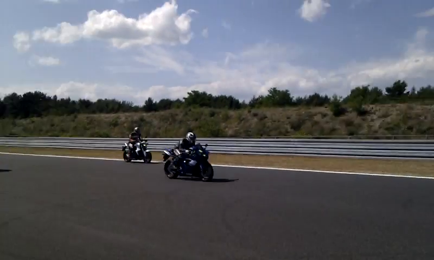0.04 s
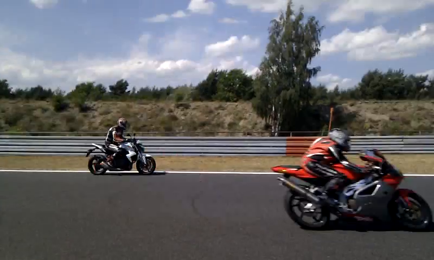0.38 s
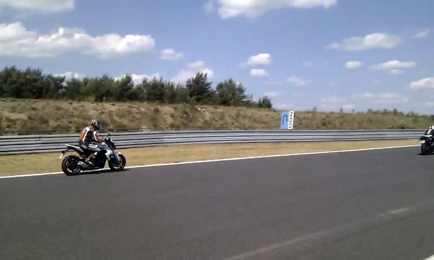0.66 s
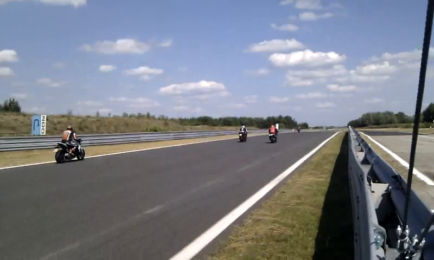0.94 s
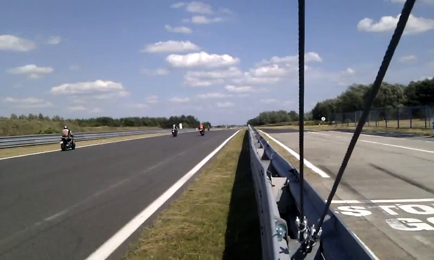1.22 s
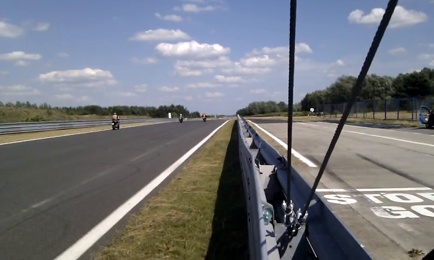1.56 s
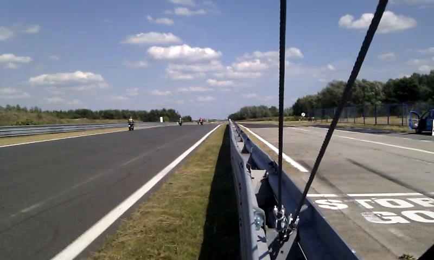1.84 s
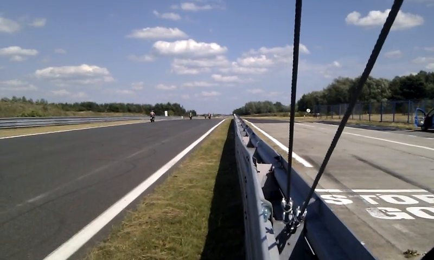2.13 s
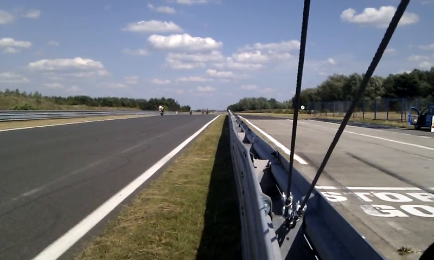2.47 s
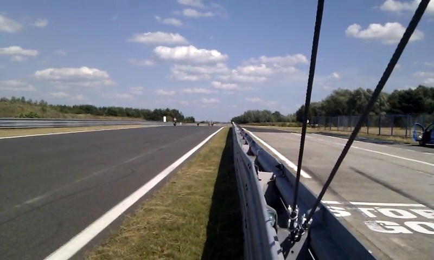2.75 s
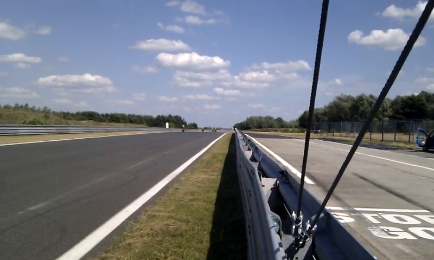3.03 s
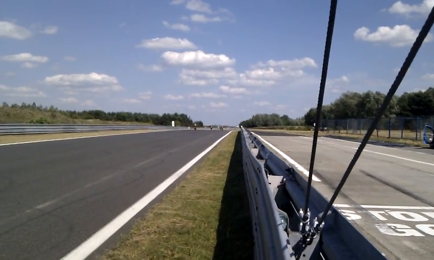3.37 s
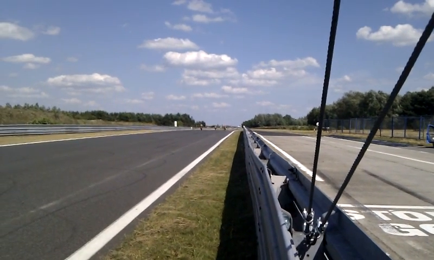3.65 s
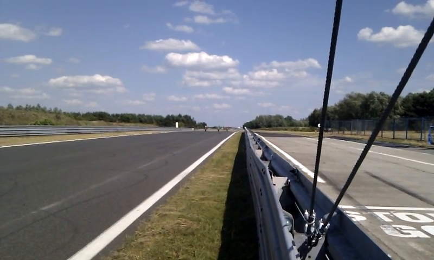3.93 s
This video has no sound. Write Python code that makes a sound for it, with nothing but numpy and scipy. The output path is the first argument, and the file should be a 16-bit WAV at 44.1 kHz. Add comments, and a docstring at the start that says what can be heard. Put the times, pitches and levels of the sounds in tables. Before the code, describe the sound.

Racing motorcycles roar by in quick succession outdoors, slightly overloading the trackside microphone. Their notes fall and recede, then a far bike faintly blips its throttle and others drone under soft wind rumble.

```python
"""Racing motorcycles passing

Three bikes pass close by, drop in pitch by the Doppler effect and fade down the straight. Each is a
sum of engine orders, intake ahead and exhaust behind, in a rush of tyres, chain and air. Later a far
bike blips its throttle and others drone. Wind bumps the small microphone, which overloads at the pass."""
import sys
import numpy as np
from scipy import signal
from scipy.fft import rfft, irfft, next_fast_len
from scipy.io import wavfile
from scipy.ndimage import uniform_filter1d, map_coordinates

SR = 44100
rng = np.random.default_rng(int(sys.argv[2]) if len(sys.argv) > 2 else 0)


def file_out(sig):
    """Save sig as 16-bit WAV at sys.argv[1]."""
    # one column per channel
    cols = np.atleast_2d(sig).T
    # limit, then scale
    lim = np.clip(cols, -1, 1)
    pcm = np.round(lim * 32767).astype(np.int16)
    wavfile.write(sys.argv[1], SR, pcm)


N = 176400
TIME = np.arange(N) / SR


def amp(db):
    """Decibels to amplitude ratio."""
    return 10 ** (np.asarray(db) / 20)


def unit(x):
    """Normalisation to rms 1."""
    return x / np.sqrt(np.mean(x ** 2) + 1e-20)


def gain_at(spectrum, hz):
    """Amplitude from levels interpolated on a log frequency axis."""
    knots_hz, db = np.transpose(spectrum)
    return amp(np.interp(np.log(hz + 1), np.log(knots_hz + 1), db))


def curves(rows):
    """Linear interpolation of each column over time."""
    times, *columns = np.transpose(rows)
    return [np.interp(TIME, times, column) for column in columns]


def wobble(rate):
    """Smooth random modulation, rate knots a second."""
    return map_coordinates(rng.standard_normal(8192), [TIME * rate], mode="wrap")


def filtered(x, response):
    """Filtering by multiplication of the spectrum."""
    size = next_fast_len(N + SR // 2)
    return irfft(rfft(x, size) * response(np.fft.rfftfreq(size, 1 / SR)), size)[:N]


def noise(spectrum, patchy_db=1.5):
    """Coloured noise of rms 1, its gain uneven over time and frequency."""
    frames = signal.stft(rng.standard_normal(N), nperseg=1024)[2]
    patches = uniform_filter1d(rng.standard_normal(frames.shape), size=7, axis=0)
    patches = uniform_filter1d(patches, size=12, axis=1)
    white = signal.istft(frames * amp(patchy_db * unit(patches)), nperseg=1024)[1][:N]
    return unit(filtered(white, lambda hz: gain_at(spectrum, hz)))


# Envelope of the weak engine orders. Each row: frequency in Hz, relative level in dB.
RASP_SPECTRUM = [(60, -25), (200, 1.5), (450, -5), (800, -11), (1500, 8), (2600, -2), (3600, 6),
                 (4300, 1.5), (5000, -4), (6000, -10.5), (8000, -40)]

def rasp(cycles, cycle_hz, count=169, size=8192):
    """Periodicity: one ragged engine cycle, repeated, gives a dense harmonic series."""
    phasors = rng.standard_normal(count) + 1j * rng.standard_normal(count)
    harmonics = gain_at(RASP_SPECTRUM, np.arange(1, count + 1) * cycle_hz) * phasors
    one_cycle = unit(irfft(np.append(0, harmonics), size))
    return np.interp(cycles % 1, np.arange(size) / size, one_cycle, period=1)


def ground_reflection(direct, pass_s, reflection=.75, lowest_notch_hz=470, abeam_s=.095):
    """Interference: the bounce off the asphalt lags most abeam, so a notch sweeps down and up again."""
    lag_s = .5 / lowest_notch_hz / np.hypot(1, (TIME - pass_s) / abeam_s)
    return (direct + reflection * np.interp(TIME - lag_s, TIME, direct)) / (1 + reflection)


def engine(path, orders, pass_s, rasp_coming_db, rasp_going_db, jitter, dulling_db=0, turn_s=.09):
    """Directivity: intake radiates ahead, exhaust behind. Returns the sound and its firing throb."""
    cycle_hz, level_db = curves(path)
    cycles = np.cumsum(cycle_hz * (1 + jitter * wobble(120))) / SR
    going = .5 + .5 * np.tanh((TIME - pass_s) / turn_s)
    tone = np.zeros(N)
    for order, coming_db, going_db in orders:
        order_db = coming_db + (going_db - coming_db) * going + 1.86 * wobble(9)
        # Off the throttle, high orders die first.
        order_db -= dulling_db * order * np.maximum(TIME - pass_s, 0)
        tone += np.sqrt(2) * amp(order_db) * np.sin(2 * np.pi * (order * cycles + rng.random()))
    tone += amp(rasp_coming_db) * np.sqrt(1 - going) * rasp(cycles, cycle_hz[0])
    tone += amp(rasp_going_db) * np.sqrt(going) * rasp(cycles, cycle_hz[SR])
    flutter_db = 1.94 * wobble(27.92)  # the sound trembles in moving air
    throb = np.cos(2 * np.pi * 4 * cycles)  # four firings a cycle
    return amp(level_db + flutter_db) * ground_reflection(tone, pass_s), throb


# Each bike as heard. Each row: time in seconds, Doppler-shifted cycle rate in Hz, level in dB.
LEAD_PATH = [(0, 51.01, -11), (.2, 48.57, 1), (.3, 45.91, 5.5), (.4, 41.95, 3.5), (.52, 38.83, -1),
             (.63, 37.46, 0), (.85, 36.42, -5.5), (1.05, 35.99, -12), (1.4, 35.1, -17.5), (2, 33.96, -22),
             (2.3, 33.35, -23.5), (2.5, 32.46, -35), (4, 30, -41.5)]
SECOND_PATH = [(0, 52.92, -3.5), (.2, 52.39, 4.5), (.3, 51.95, 6), (.39, 49.85, 10), (.47, 45.48, 5),
               (.55, 40.87, 9.5), (.65, 39.5, -7), (1.2, 38.89, -23.5), (2.3, 37.76, -40), (4, 37.12, -53)]
THIRD_PATH = [(0, 61.08, -14), (.42, 60, -10), (.53, 55.22, 4.5), (.6, 52.83, 6), (.65, 49.67, -17),
              (.72, 48.28, -1.5), (.95, 46.3, -11.5), (1.2, 45.32, -15.5), (1.6, 45.62, -17),
              (2.2, 45.85, -28), (2.7, 45.93, -31.5), (3, 46.53, -35), (4, 46.1, -44)]
# Strong orders, the highest being gear whine.
# Each row: multiple of the cycle rate, relative level in dB coming, relative level in dB going.
LEAD_PARTIALS = [(4, -36, -33), (5, -37, -32.5), (6, -22.5, -25), (7, -13, -17), (8, -25.5, -27.5),
                 (10, -29, -25), (16, -32.5, -30.5), (20, -28, -30), (26, -58, -33), (32, -32.5, -24.5),
                 (52.9, -26.5, -37)]
SECOND_PARTIALS = [(4, -25, -26.5), (6, -23, -31), (8, -28.5, -25.5), (10, -22, -31.5), (14, -21.5, -28),
                   (16, -23, -22.5), (18, -11.5, -23), (20, -22, -25), (22, -17, -33), (26, -28.5, -26.5),
                   (28.1, -38.5, -21), (30, -23.5, -22), (80.7, -18.5, -39)]
THIRD_PARTIALS = [(4, -27, -26), (8, -52, -27.5), (13, -36.5, -31.5), (16, -29, -26.5), (18, -40, -27.5),
                  (20, -15.5, -32), (22, -15.5, -44.5), (23, -16, -43), (24, -32, -38), (28, -24, -35),
                  (89.6, -36, -25), (98, -28, -23), (105, -26, -26)]

def passing_bikes():
    """Doppler effect: three engines fall in pitch in turn. Returns their sum and mean throb."""
    engines, throbs = zip(
        engine(LEAD_PATH, LEAD_PARTIALS, pass_s=.31,
               rasp_coming_db=-16, rasp_going_db=-19.5, jitter=.003, dulling_db=.05),
        engine(SECOND_PATH, SECOND_PARTIALS, pass_s=.5,
               rasp_coming_db=-15.5, rasp_going_db=-13.5, jitter=.0012),
        engine(THIRD_PATH, THIRD_PARTIALS, pass_s=.59,
               rasp_coming_db=-7, rasp_going_db=-19.5, jitter=.00208))
    return sum(engines), np.mean(throbs, axis=0)


# Tyres, chain and air. Each row: time in seconds, roar level in dB, hiss level in dB.
RUSH_LEVELS = [(0, -16.5, -22.5), (.13, -15, -8.5), (.3, -8, -4), (.42, 2, 1.5), (.55, -1.5, -0.5),
               (.62, -11, -7), (.68, -12, -15.5), (.9, -19.5, -19.5), (1.15, -21.5, -29),
               (1.25, -25.5, -27), (1.8, -35, -34), (2.2, -37, -35), (2.47, -41.5, -38),
               (2.75, -39.5, -40.5), (2.9, -48.5, -50), (3.25, -45, -48), (3.57, -47, -49.5),
               (4, -58.5, -54.5)]
# Their spectra, with the microphone's resonance near 4 kHz.
# Each row: frequency in Hz, relative spectral density in dB.
ROAR_SPECTRUM = [(60, -31), (250, 0), (470, -5), (750, 1.5), (1150, -1), (1500, -2.5), (2600, 4), (3600, 4),
                 (5000, 0.5), (6300, -11), (9000, -26.5), (15000, -85)]
HISS_SPECTRUM = [(1500, -36), (3000, -22), (3800, -1.5), (4350, 3), (4800, -1.5), (5400, -9), (6300, -18.5),
                 (8000, -45.5), (15000, -91.5)]

def rush(throb, depth=.13):
    """Amplitude modulation: the noise of tyres, chain and air pulses with the firing."""
    roar_db, hiss_db = curves(RUSH_LEVELS)
    roar = amp(roar_db + 1.07 * wobble(25)) * noise(ROAR_SPECTRUM)
    hiss = amp(hiss_db + 1.07 * wobble(30)) * noise(HISS_SPECTRUM)
    return (roar + hiss) * (1 + depth * throb)


# Wind rumble. Each row: time in seconds, level in dB.
WIND_LEVELS = [(0, -22.5), (.4, -24), (.7, -37.5), (1.3, -40.5), (2, -42.5), (2.7, -46.5), (3.1, -47),
               (4, -47)]
# Its spectrum. Each row: frequency in Hz, relative spectral density in dB.
WIND_SPECTRUM = [(20, 0.5), (50, -3), (110, 2.5), (250, -4), (500, -12), (1000, -37), (3000, -55.5)]
# Bumps. Each row: centre in seconds, level in dB, Gaussian width in seconds, upper edge in Hz.
WIND_BUMPS = [(0.987, -32, .01, 110), (1.332, -37.5, .014, 119.6), (1.16, -31, 0.013, 172),
              (1.837, -27, 0.0083, 70.5), (2.414, -31.5, 0.01, 455), (2.772, -34, 0.017, 147.1),
              (3.307, -25.5, 0.0043, 280), (3.381, -36, 0.034, 433), (3.404, -28.5, 0.0035, 524),
              (3.646, -36, 0.0067, 383)]

def wind():
    """Turbulence: fluctuating pressure on the microphone makes a low rumble and short bumps."""
    level_db, = curves(WIND_LEVELS)
    sound = amp(level_db + .5 * wobble(9.5)) * noise(WIND_SPECTRUM)
    for centre_s, db, width_s, edge_hz in WIND_BUMPS:
        swell = np.exp(-.5 * ((TIME - centre_s) / width_s) ** 2)
        puff = filtered(swell * rng.standard_normal(N), lambda hz: 1 / (1 + (hz / edge_hz) ** 4.18))
        sound += amp(db) * puff * np.linalg.norm(swell) / np.linalg.norm(puff)
    return sound


# Outdoor background. Each row: frequency in Hz, relative spectral density in dB.
AIR_SPECTRUM = [(30, 16.5), (120, 2), (260, -6.5), (450, -1.5), (800, 3.5), (2000, 5.5), (4300, -16),
                (6500, -42), (15000, -51)]

def open_air(level_db=-51.5):
    """Masking: a faint ambient noise floor lies hidden until the bikes recede."""
    return amp(level_db) * noise(AIR_SPECTRUM)


# A far bike changing down. Each row: time in seconds, firing rate in Hz, level in dB.
BLIP_PATH = [(2.08, 245.8, -75), (2.19, 289.6, -45), (2.28, 315, -45), (2.36, 296.8, -43), (2.46, 266, -46),
             (2.56, 256, -49), (2.86, 250.1, -53), (2.98, 248, -78)]
# Its orders. Each row: multiple of the firing rate, relative level in dB.
BLIP_PARTIALS = [(.5, -6.5), (1, 0.5), (1.5, -13), (2, -9.5)]

def throttle_blip():
    """Pitch follows firing rate: all orders jump and sink back with the revs."""
    firing_hz, level_db = curves(BLIP_PATH)
    phase = 2 * np.pi * np.cumsum(firing_hz * (1 + .008 * wobble(55))) / SR
    return sum(np.sqrt(2) * amp(level_db + db + 2 * wobble(23)) * np.sin(order * phase)
               for order, db in BLIP_PARTIALS)


# Far engine notes. Each row: start in seconds, frequency in Hz, level in dB,
# pitch wander as a fraction, flutter in dB.
FAR_DRONES = [(2.85, 175, -51, .015, 2.5), (3.05, 243, -48, .02, 2.5), (2.6, 839, -57, .002, 1.2)]

def far_bikes(rise_s=.15):
    """Random modulation: each distant engine is one tone wavering in pitch and level."""
    sound = np.zeros(N)
    for start_s, hz, db, wander, flutter_db in FAR_DRONES:
        phase = 2 * np.pi * np.cumsum(hz * (1 + wander * wobble(16))) / SR
        fade_in = np.clip((TIME - start_s) / rise_s, 0, 1)
        sound += fade_in * amp(db + flutter_db * wobble(15)) * np.sqrt(2) * np.sin(phase)
    return sound


def scene():
    """Superposition: all sources add at one microphone."""
    engines, throb = passing_bikes()
    return (engines + rush(throb) + wind() + open_air() + throttle_blip() + far_bikes())[None]


def record(dry, ceiling=.67, hardness=3.3, cutoff_hz=15700):
    """Saturation: the overloaded input clips softly; one band-limited signal feeds both channels."""
    clipped = dry[0] / (1 + np.abs(dry[0] / ceiling) ** hardness) ** (1 / hardness)
    band_limited = filtered(clipped, lambda hz: 1 / (1 + (hz / cutoff_hz) ** 300))
    return np.tile(band_limited, (2, 1))


dry = scene()
out = record(dry)
file_out(out)
```